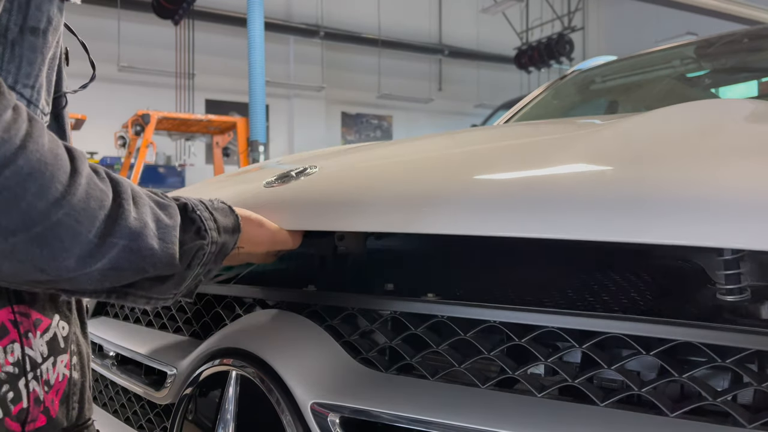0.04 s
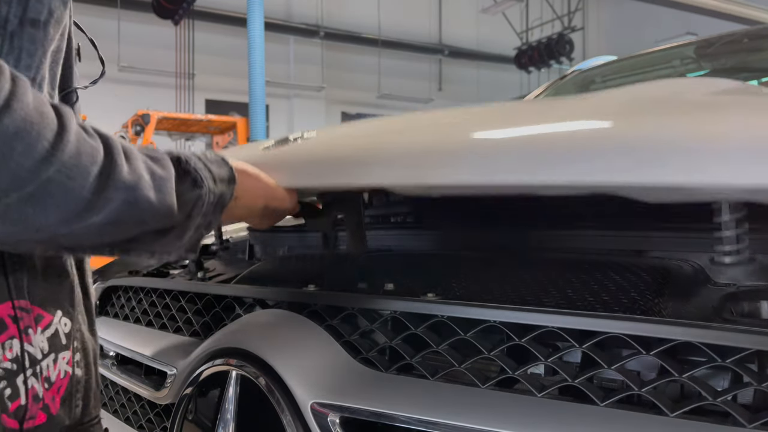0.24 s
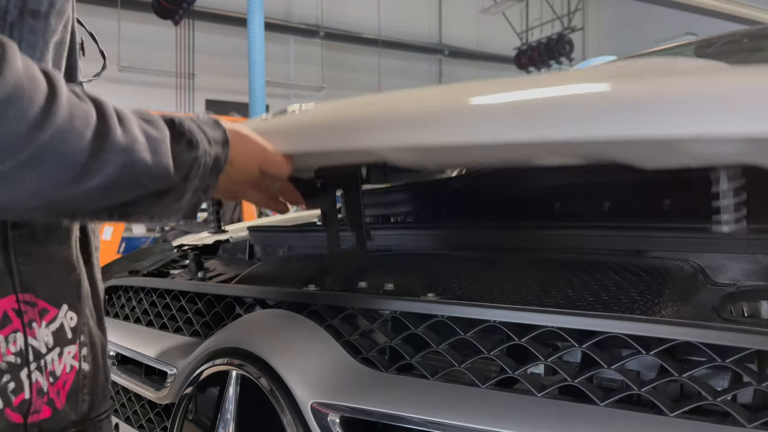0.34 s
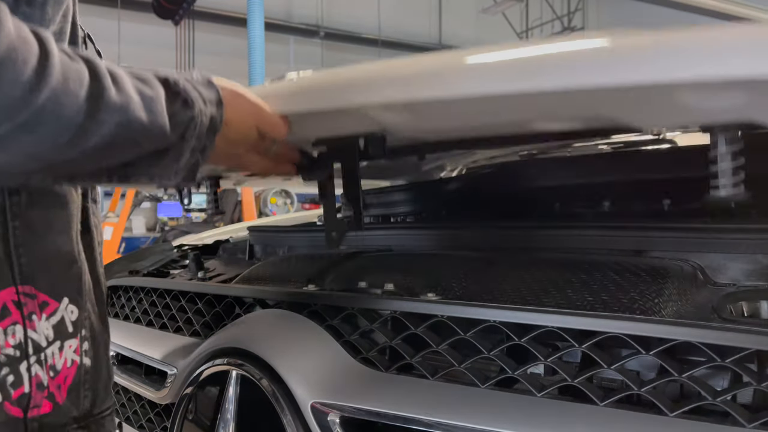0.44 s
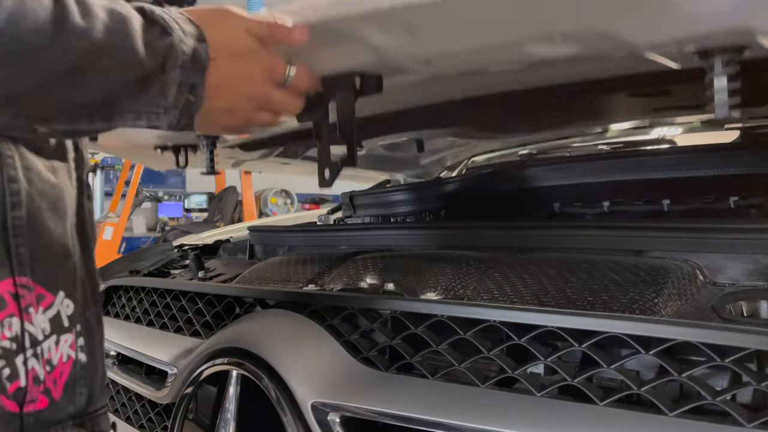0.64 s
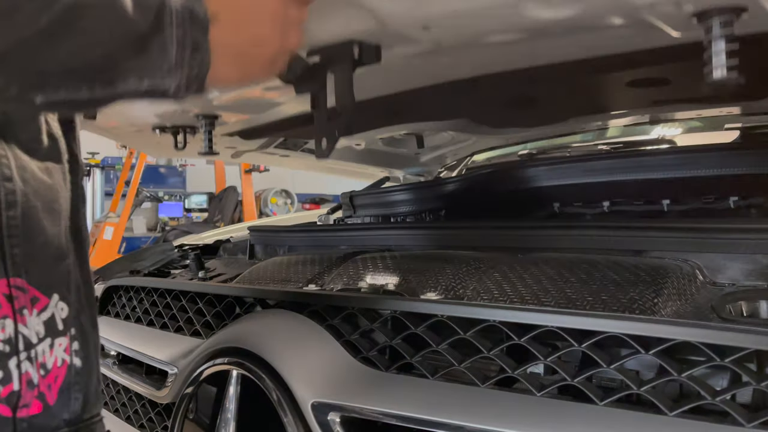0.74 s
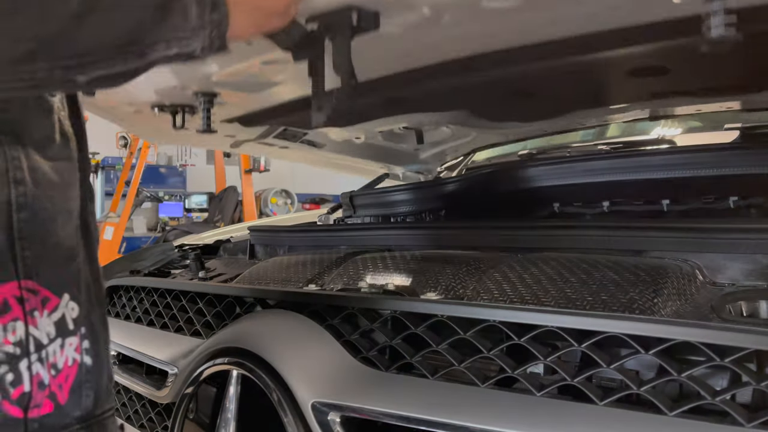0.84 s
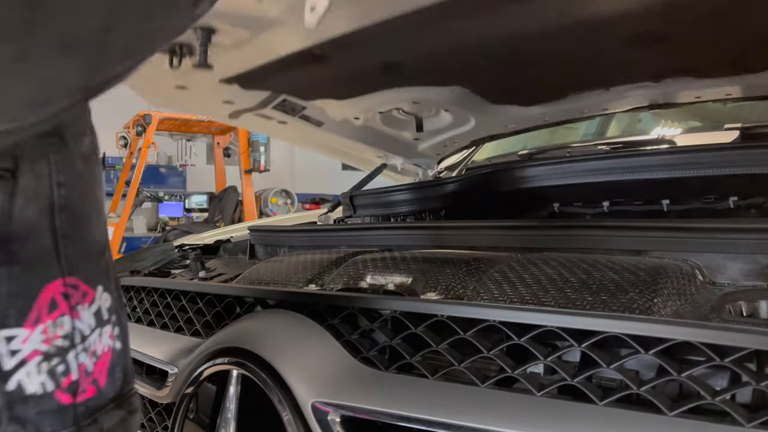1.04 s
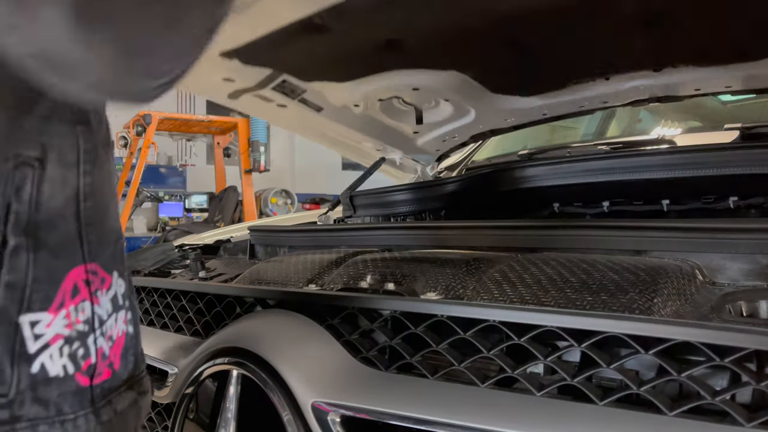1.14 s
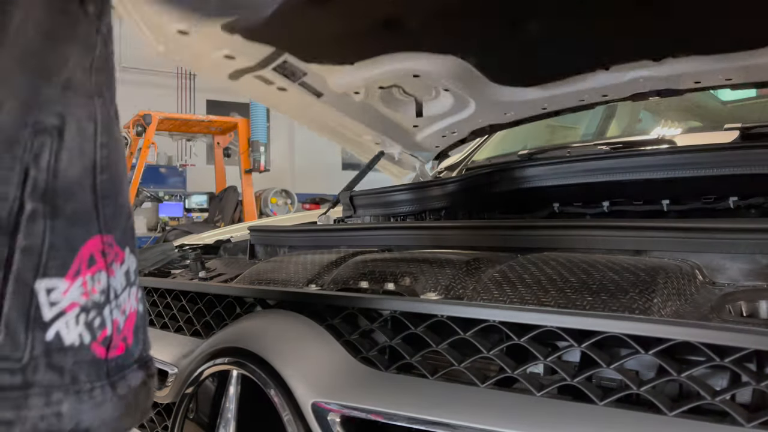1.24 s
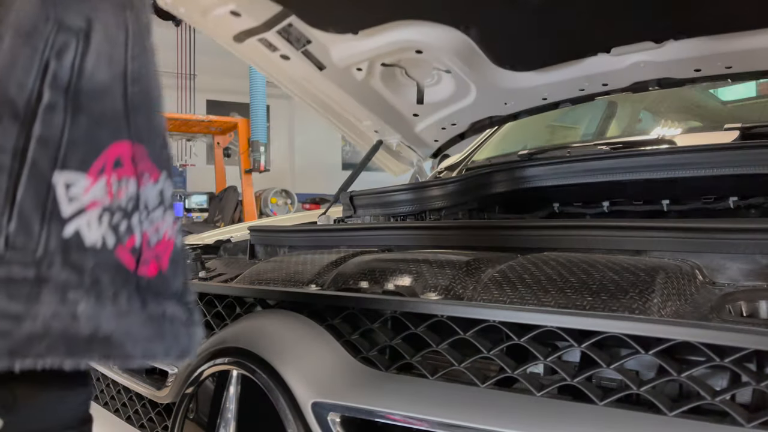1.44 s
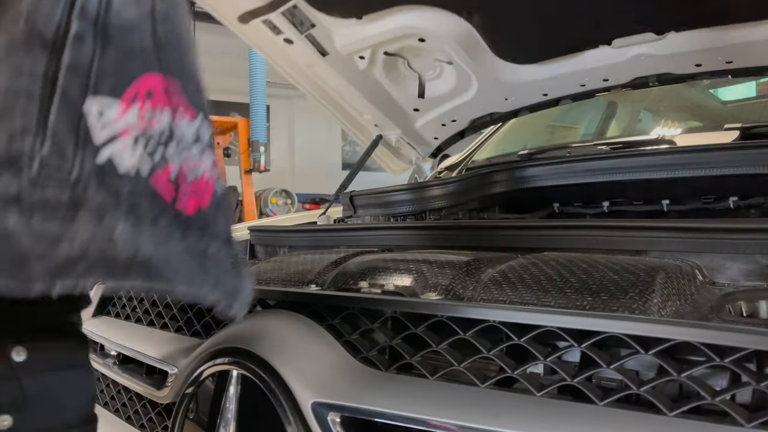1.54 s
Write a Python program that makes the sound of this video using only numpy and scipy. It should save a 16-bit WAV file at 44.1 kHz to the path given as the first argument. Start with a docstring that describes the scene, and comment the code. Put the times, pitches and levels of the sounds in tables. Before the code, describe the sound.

A car hood catch releases with a sharp, bouncing steel clack and hollow panel boom, echoing in a large workshop; soft thuds, a faint hollow hum and growing gas strut hiss follow, close stereo microphone.

```python
"""Opening a car hood in a workshop

A car hood is unlatched and lifted in a large workshop. The steel catch snaps back and bounces: noise cracks
and dying sine tones, while slower tones make the hood panel boom. Soft thuds reuse the panel tones.
Shaped noise makes the hollow hum of the hood, a jacket's rustle and the gas struts' hiss, which mostly
grows as they extend. Ventilation mixes air noise with low hum tones. Echoes add the nearby surfaces
and a hall that rings on."""
import sys
import numpy as np
from scipy import signal
from scipy.fft import rfft, irfft, next_fast_len
from scipy.io import wavfile
from scipy.ndimage import uniform_filter1d, map_coordinates

SR = 44100
rng = np.random.default_rng(int(sys.argv[2]) if len(sys.argv) > 2 else 0)


def to_wav(s):
    """Save 16-bit WAV."""
    ch = np.atleast_2d(s).T  # columns
    pcm = np.round(np.clip(ch, -1, 1) * 32767)  # PCM
    wavfile.write(sys.argv[1], SR, pcm.astype(np.int16))


N = 70560  # length of the scene in samples

# Noise colour of a crack: (frequency [Hz], relative level per Hz [dB])
CRACK_COLOUR = [(480, -6), (650, -4.5), (1000, -5.5), (1500, -2.5), (2500, -4), (4200, -9), (6000, -9),
                (8500, -4.5), (9700, -5), (10700, -10), (11500, -15), (13000, -34)]
# Ringing tones of the steel catch: (frequency [Hz], relative level [dB], time to fade by 60 dB [s])
CATCH_TONES = [(1225, -12, .065), (1560, -13, .025), (1860, -16, .02), (2085, -14, .022), (2430, -12, .022),
               (3015, -12, .018), (3450, -15, .015), (5830, -12, .018), (7200, -11, .018), (8300, -6, .018),
               (8600, -6, .018), (9450, -9, .018)]


def catch_hit(t, light):
    """Steel struck on steel: short ringing tones plus a burst of noise that dies quickly."""
    crack = filtered(rng.standard_normal(len(t)), lambda hz: amp(along(CRACK_COLOUR, hz)) * (hz > 450))
    crack = unit(crack) * (1 - np.exp(-t / 0.0011))  # swells in about a millisecond
    crack_fade = amp(8.5 - 60 * t / 0.027)  # starts at 8.5 dB, drops 60 dB in 0.027 s
    hit = ring(CATCH_TONES, t, rise_cycles=1.6, flutter_db=5.0) + crack_fade * crack
    if light:
        bounce_hz = 5600  # light bounces keep mostly the treble
        hit = filtered(hit, lambda hz: (1j * hz / (bounce_hz + 1j * hz)) ** 3)
    return hit


# Booming tones of the hood panel: (frequency [Hz], relative level [dB], time to fade by 60 dB [s])
PANEL_TONES = [(81, -18.5, 0.25), (114.3, -12, 0.38), (154.5, -18, 0.35), (190.9, -8.5, 0.31),
               (229.6, -19.5, 0.48), (261.5, -9.5, 0.27), (282, -0.5, 0.15), (334, 4, 0.12),
               (378.7, -9.5, 0.17), (391, -21, 0.099), (452.3, -13.5, 0.224), (514, -11, 0.29),
               (589, -7.5, 0.068), (631, -2, 0.078), (682, -7.5, 0.048), (791, -15, 0.061),
               (867, -19, 0.12)]


def panel_boom(t, flutter_db):
    """Sheet metal set swinging: each tone swells over a few cycles, then dies away."""
    return ring(PANEL_TONES, t, rise_cycles=1.8, flutter_db=flutter_db)


def thud(t, favoured_hz):
    """A soft push on the panel: a slower start, extra damping and one favoured pitch range."""
    width_hz, rise_s, fade_s = 65, 0.008, 0.11
    soft = panel_boom(t, flutter_db=0.5) * amp(-60 * t / fade_s) * (1 - np.exp(-t / rise_s))

    def resonance(hz):
        damping = 1j * hz * width_hz
        return (damping / (favoured_hz ** 2 - hz ** 2 + damping)) ** 2

    return filtered(soft, resonance)


# Contacts of the catch: (time [s], catch gain [dB], panel gain [dB])
CATCH_CONTACTS = [(.2378, -16, -9.5), (.2402, -18.5, -14), (.2428, -26.5, -20), (.2642, -22.5, -19.5),
                  (.2685, -35.5, -27.5), (.279, -28.5, -28), (.29, -38, -30)]
# Soft thuds of the hood on its hinges: (time [s], favoured frequency [Hz], gain [dB])
HINGE_THUDS = [(0.48, 380, -16.5), (.719, 190, -8.5)]


def hood():
    """Every contact cracks and rings the catch and booms the panel; thuds only move the panel."""
    out = np.zeros(N)
    t = np.arange(SR // 2) / SR
    panel_lag_s = 0.00304  # the panel answers late
    for k, (start, catch_db, panel_db) in enumerate(CATCH_CONTACTS):
        add(out, start, amp(catch_db) * catch_hit(t, light=k > 2))
        add(out, start + panel_lag_s, amp(panel_db) * panel_boom(t, flutter_db=2.2))
    for start, favoured_hz, level_db in HINGE_THUDS:
        add(out, start, amp(level_db) * thud(t, favoured_hz))
    return out


# Hum of the hollow hood while it swings up: (time [s], level [dB])
HOLLOW_LEVEL = [(.38, -60), (.46, -51), (.55, -49), (.7, -44.5), (.86, -56), (.92, -76), (1.02, -55),
                (1.12, -63), (1.2, -70)]


def hollow():
    """Handling shakes the air in the hood, which favours one narrow band of noise."""
    centre_hz, width_hz = 341, 25
    s, db = np.transpose(HOLLOW_LEVEL)
    level_db = np.interp(np.arange(N) / SR, s, db, left=-120, right=-120)
    hum = rush(lambda hz: 1 / (1 + (2 * (hz - centre_hz) / width_hz) ** 2), patchy_db=2)
    return amp(level_db) * hum


# Strut hiss: (time [s], level [dB])
HISS_LEVEL = [(0.8, -84), (0.886, -71), (0.948, -56.5), (1.136, -54), (1.198, -50.5), (1.3, -51),
              (1.55, -42.5), (1.6, -43)]
# Colour of the hiss: (frequency [Hz], relative level per Hz [dB])
HISS_COLOUR = [(1200, -7.5), (1800, -15), (3500, -10.5), (5500, -14), (7000, -9), (8500, -5.5), (9900, 4.5),
               (10800, -1), (11500, -10.5), (12300, -26), (13000, -27)]
# Valve resonances:
# (frequency [Hz], width [Hz], level before wavering [dB], loudest time [s], spread in time [s])
VALVE_BANDS = [(2820, 390, -64, 1.234, 0.18), (4100, 250, -65, 1.24, 0.035),
               (4200, 380, -59.5, 1.357, 0.019), (4450, 310, -60, 1.46, 0.028),
               (4340, 940, -56.5, 1.533, 0.16), (7010, 600, -45.5, 1.522, 0.066),
               (7080, 370, -60.5, 1.43, 0.24)]


def struts():
    """Gas rushing through the valves: broad hiss and breathy bands that come and go."""
    s, db = np.transpose(HISS_LEVEL)
    t = np.arange(N) / SR
    noise = rush(lambda hz: amp(along(HISS_COLOUR, hz)) * (hz > 1000), patchy_db=2.4)
    out = amp(np.interp(t, s, db)) * (t > s[0]) * noise
    for centre_hz, width_hz, level_db, loudest_s, span_s in VALVE_BANDS:
        swell = np.exp(-((t - loudest_s) / span_s) ** 2 / 2)
        band = rush(lambda hz: 1 / (1 + (2 * (hz - centre_hz) / width_hz) ** 4), patchy_db=1.5)
        out = out + amp(level_db + 0.77 * wobble(14.5)) * swell * band
    return out


def jacket():
    """A jacket swings past: rubbing cloth as a soft, uneven low band of noise."""
    centre_hz, width_hz = 520, 620
    loudest_s, span_s = 1.577, 0.15
    swell = np.exp(-((np.arange(N) / SR - loudest_s) / span_s) ** 2 / 2)
    level = amp(-56.5 + 2.7 * wobble(25.6))
    cloth = rush(lambda hz: hz / (hz + 150) / (1 + (2 * (hz - centre_hz) / width_hz) ** 2), patchy_db=0.5)
    return level * swell * cloth


# Colour of the ventilation air, before its lows are thinned: (frequency [Hz], relative level per Hz [dB])
AIR_COLOUR = [(18, -11), (30, 1.5), (71, -7), (200, -16.5), (260, -19), (430, -18.5), (750, -26.5),
              (1870, -35.5), (4000, -43), (7200, -46.5), (8600, -38.5), (10200, -35), (11100, -38.5),
              (11700, -59), (13000, -92)]
# Ventilation hum: (frequency [Hz], level before wavering [dB])
HUM_TONES = [(43.1, -47), (60, -54.5), (204, -57.5)]


def workshop():
    """Ventilation: broad air noise and low tones, slightly unsteady in level and pitch."""
    t = np.arange(N) / SR
    # the division thins the air noise below about 70 Hz
    air = rush(lambda hz: amp(along(AIR_COLOUR, hz)) * hz ** 2 / (hz ** 2 + 70 ** 2), patchy_db=1.2)
    out = amp(-48 + 0.7 * wobble(1.7)) * air
    for hz, level_db in HUM_TONES:
        cycles = hz * t + rng.random() + 0.011 * wobble(5.2)
        tone = np.sqrt(2) * np.sin(2 * np.pi * cycles)  # rms 1
        out = out + amp(level_db + 1.3 * wobble(4.8)) * tone
    return out


# Echo of the engine bay and floor: (frequency [Hz], time to fade by 60 dB [s])
BAY_FADE = [(80, 0.3), (1000, 0.25), (10000, 0.073)]


def bay_echo(near):
    """Nearby clutter swallows treble, and long waves pass round it, so its echo lacks both ends."""
    thin_hz, dull_hz = 320, 2780
    returned = filtered(near, lambda hz: 1j * hz / (thin_hz + 1j * hz) / (1 + 1j * hz / dull_hz))
    return amp(-5) * echo(returned, BAY_FADE, delay_s=0.003)


# Echo of the hall: (frequency [Hz], time to fade by 60 dB [s])
HALL_FADE = [(80, 3.5), (340, 2.2), (1000, 2.6), (3000, 1.07), (6000, 0.96), (10000, 0.27)]


def hall_echo(near):
    """The large hall answers a little later and rings on."""
    return amp(-22) * echo(radiated(near), HALL_FADE, delay_s=0.027)


def radiated(x):
    """What the hall receives from all sides: one blow of the same energy, narrow peaks averaged out."""
    blend = 0.12  # averages from 12% below to 12% above each frequency
    total = np.cumsum(np.abs(rfft(x)) ** 2)
    k = np.arange(N // 2 + 1)
    lo, hi = k * (1 - blend), k * (1 + blend) + 1
    power = (np.interp(hi, k, total) - np.interp(lo, k, total)) / (hi - lo)
    blow = irfft(np.sqrt(np.abs(power)), N)
    return np.roll(blow, round(CATCH_CONTACTS[0][0] * SR))  # moved to the first contact


def echo(x, decay, delay_s):
    """Reverberation as a burst of noise in which each frequency dies at its own speed."""
    hz, t, z = signal.stft(rng.standard_normal((2, N)), SR, nperseg=256)
    fade = amp(-60 * t / along(decay, hz)[:, None])
    noise = signal.istft(z * fade, SR, nperseg=256)[1][:, :N]
    tail = spread(noise, np.ones_like) / np.sqrt(N)
    delayed = np.pad(x, (round(delay_s * SR), 0))
    return signal.fftconvolve(delayed[None], tail, axes=1)[:, :N]


def ring(modes, t, rise_cycles, flutter_db):
    """A sum of dying tones, each swelling over a few cycles and fluttering in level."""
    out = np.zeros(len(t))
    for hz, db, t60 in modes:
        flutter = flutter_db * wobble(60)[:len(t)]
        swell = 1 - np.exp(-t * hz / rise_cycles)
        out += amp(db + flutter - 60 * t / t60) * np.sin(2 * np.pi * hz * t) * swell
    return out


def rush(gain, patchy_db):
    """Stereo noise of rms 1, with patches in time and pitch that are louder or softer."""
    z = signal.stft(rng.standard_normal((2, N)), nperseg=512)[2]
    field = rng.standard_normal(z.shape[1:])
    field = uniform_filter1d(field, size=6, axis=0)  # smooth over frequency
    field = uniform_filter1d(field, size=14, axis=1)  # smooth over time
    noise = signal.istft(z * amp(patchy_db * unit(field)), nperseg=512)[1][:, :N]
    return spread(noise, gain)


# Left-right likeness of diffuse sound: (frequency [Hz], likeness [0 to 1])
LIKENESS = [(60, .98), (130, .96), (350, .75), (1000, .15), (1700, .3), (2400, .6), (4500, .75),
            (5200, .45), (7200, .7), (8000, 1)]


def spread(pair, gain):
    """Two noises mixed so that left and right are partly alike, as in sound from all around."""
    def mix(hz):
        turn = np.arccos(along(LIKENESS, hz)) / 2
        return gain(hz) * np.array([np.cos(turn), np.sin(turn)])

    mid, side = filtered(pair, mix)
    return unit(np.array([mid + side, mid - side]))


def amp(db):
    """Turns decibels into a gain."""
    return 10 ** (np.asarray(db) / 20)


def unit(x):
    """Scales a signal to rms 1."""
    return x / np.sqrt(np.mean(x ** 2) + 1e-20)


def along(points, hz):
    """Reads between (frequency, value) points on a logarithmic frequency axis."""
    f, v = np.transpose(points)
    return np.interp(np.log(hz + 1), np.log(f + 1), v)


def wobble(rate):
    """A smooth random curve with `rate` random points a second."""
    knots = rng.standard_normal(int(N * rate / SR) + 4)
    return map_coordinates(knots, [np.arange(N) * rate / SR])


def filtered(x, response):
    """Changes the strength and phase of each frequency by a given response."""
    m = next_fast_len(N + SR // 2)
    return irfft(rfft(x, m) * response(np.fft.rfftfreq(m, 1 / SR)), m)[..., :x.shape[-1]]


def add(track, s, sound):
    """Mixes a sound into the track at time s."""
    part = track[round(s * SR):][:len(sound)]
    part += sound[:len(part)]


def scene():
    """The hood close by with its echoes, the softer sounds and the workshop air."""
    near = hood()
    echoes = bay_echo(near) + hall_echo(near)
    return near + echoes + hollow() + struts() + jacket() + workshop()


# Phase between the two microphone ports, opposite near 10 kHz: (frequency [Hz], left leads by [radians])
PORT_LEAD = [(300, 0), (900, 0), (1700, -1), (2400, .3), (3100, .9), (7900, .65), (8600, 0), (9300, -1.7),
             (10250, -np.pi), (10700, -3.7), (11370, -5.3), (12000, -2 * np.pi)]
# Level between the two ports: (frequency [Hz], left minus right [dB])
PORT_LEAN = [(60, .4), (350, .9), (1000, 1), (2400, 3.3), (5500, 3.5), (7200, 1.5), (8000, 0)]


def record(dry):
    """Each port has its own level and phase; peaks saturate softly; then the top is cut off."""
    ceiling, top_hz = 0.8, 12950
    sides = np.array([[1], [-1]]) / 2  # half the difference goes to each side

    def port(hz):
        return amp(sides * along(PORT_LEAN, hz)) * np.exp(1j * sides * along(PORT_LEAD, hz))

    ports = filtered(dry, port)
    soft = ports / (1 + (ports / ceiling) ** 4) ** (1 / 4)
    return filtered(soft, lambda hz: hz < top_hz)


dry = scene()
out = record(dry)
to_wav(out)
```